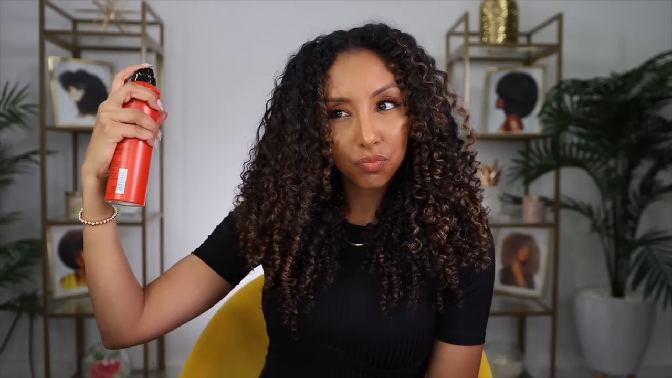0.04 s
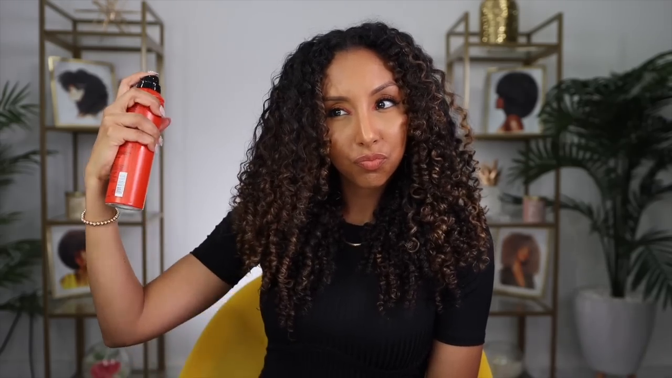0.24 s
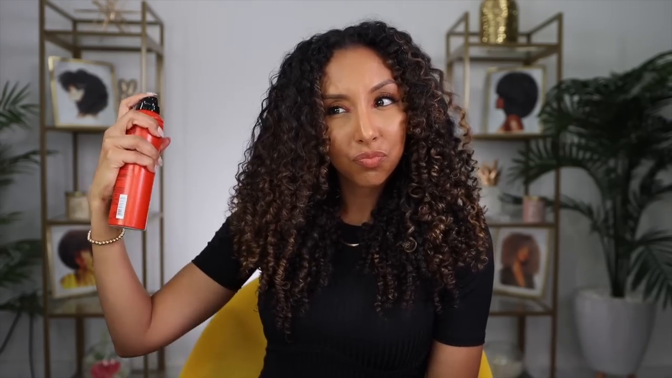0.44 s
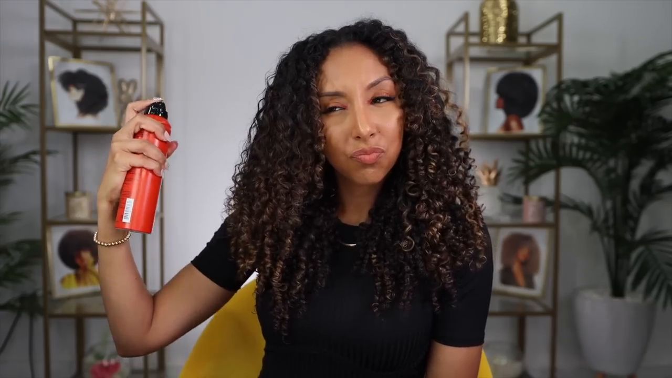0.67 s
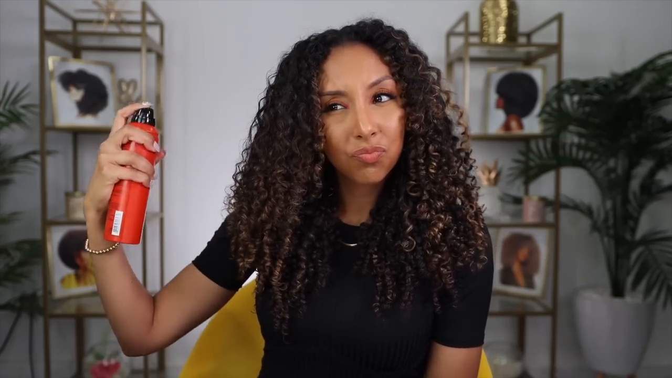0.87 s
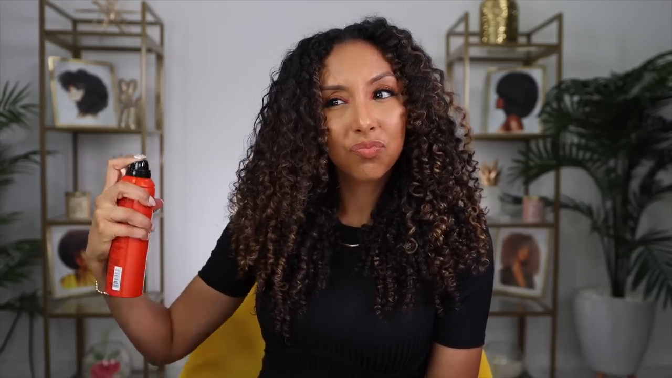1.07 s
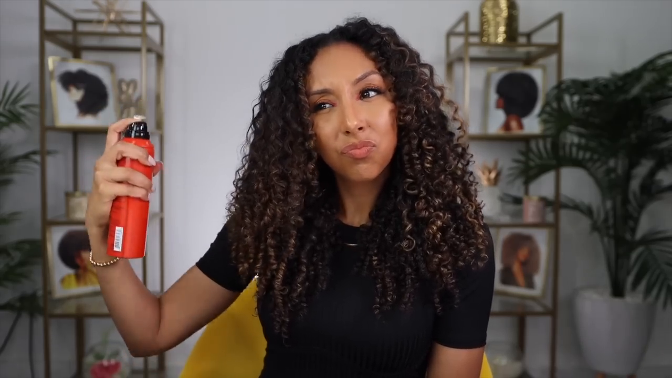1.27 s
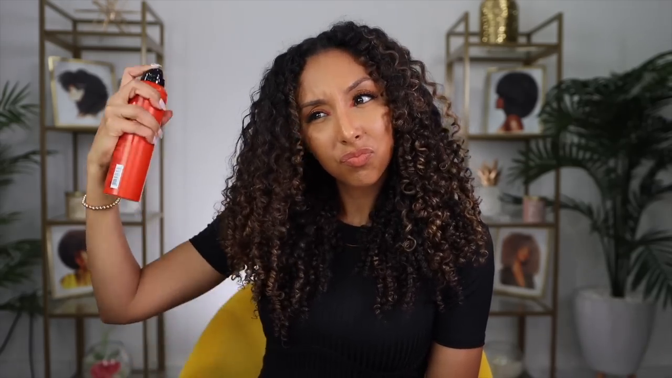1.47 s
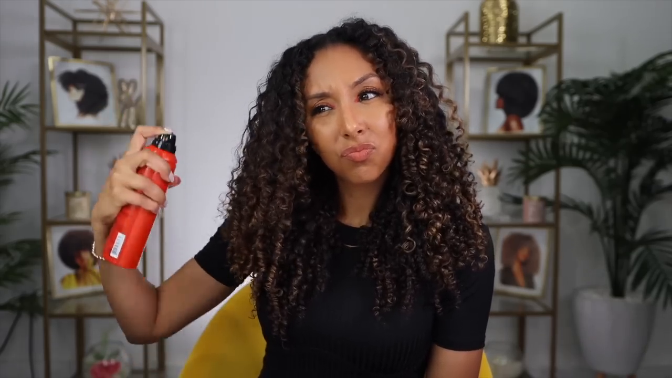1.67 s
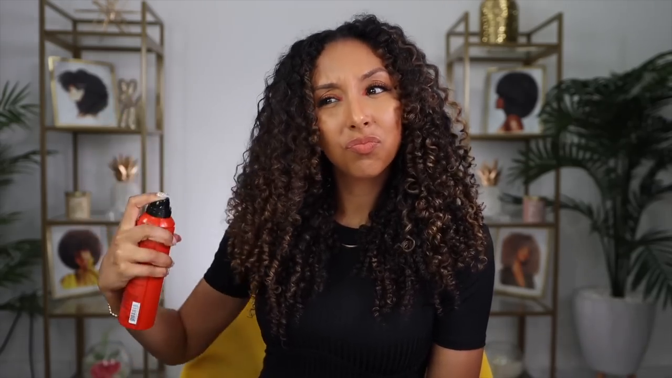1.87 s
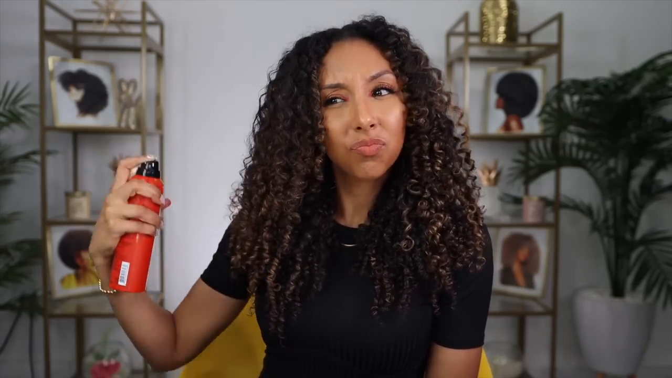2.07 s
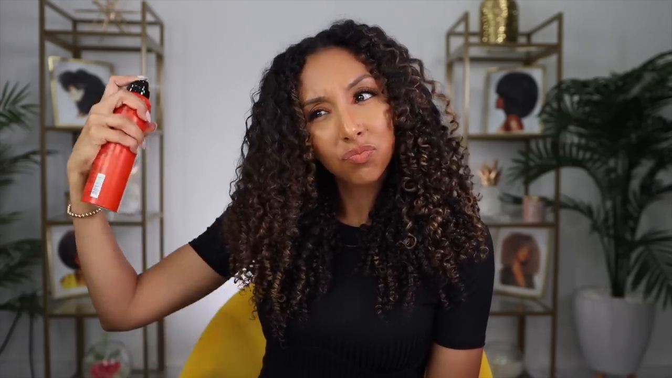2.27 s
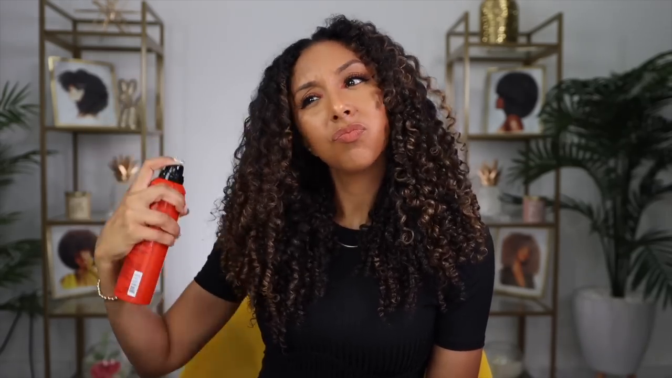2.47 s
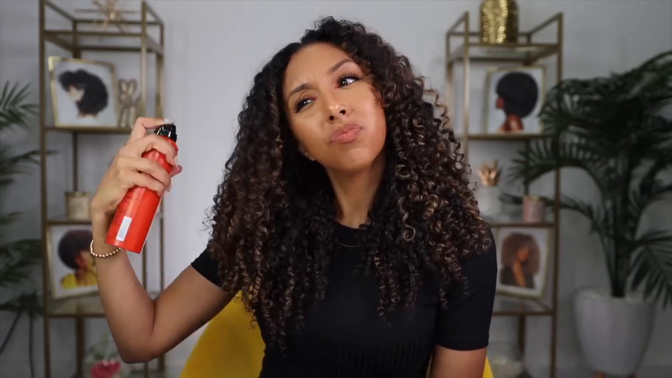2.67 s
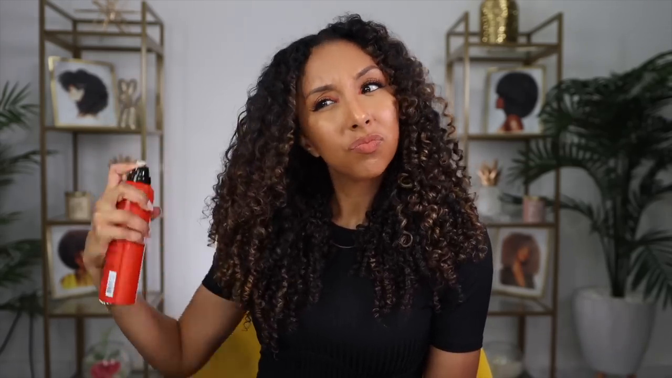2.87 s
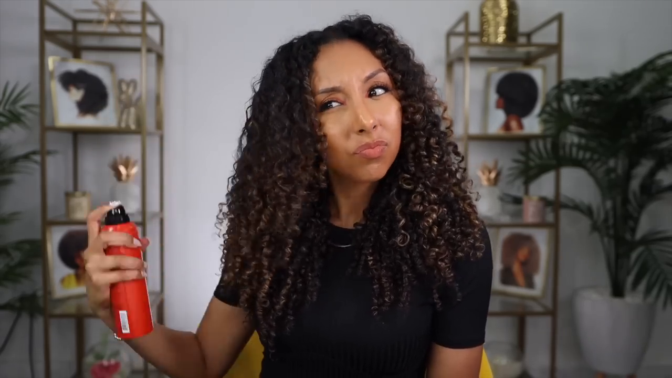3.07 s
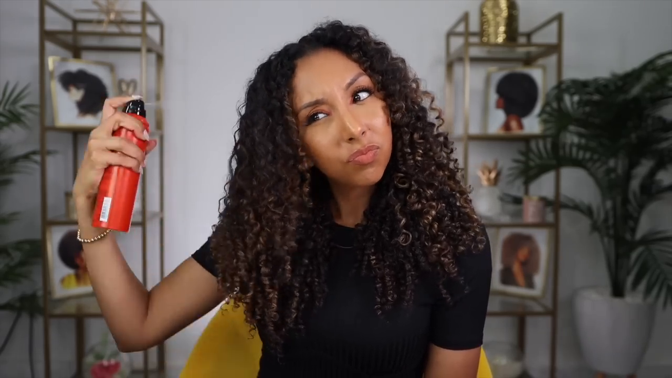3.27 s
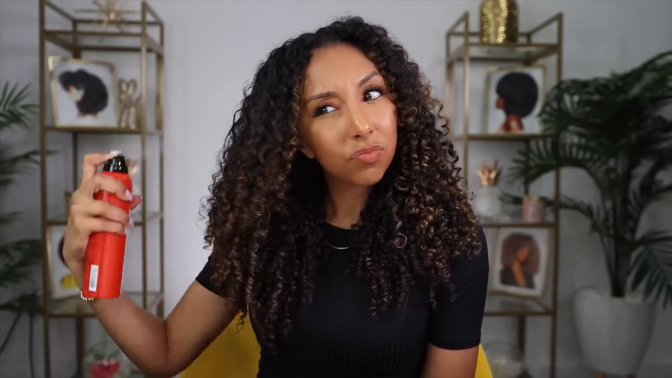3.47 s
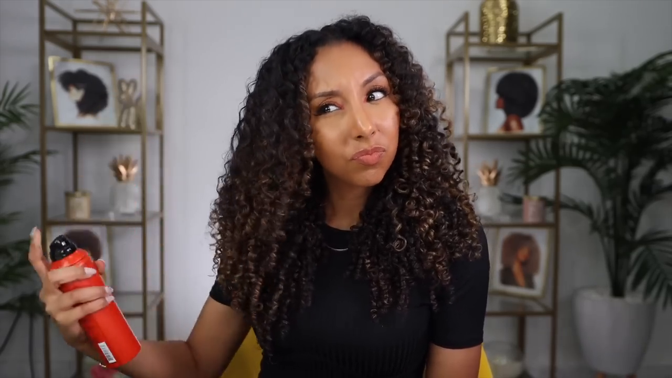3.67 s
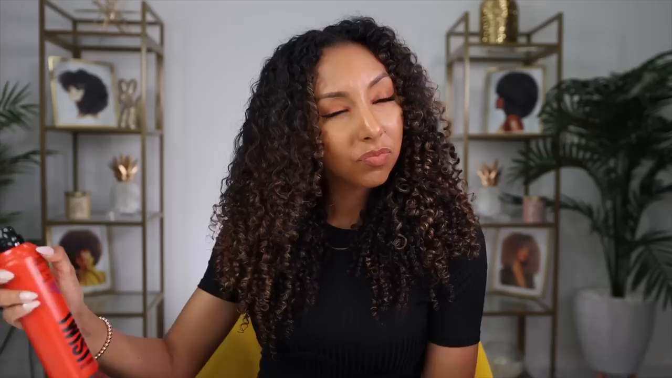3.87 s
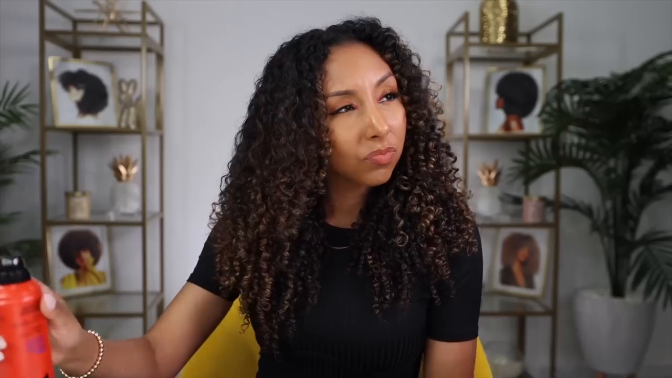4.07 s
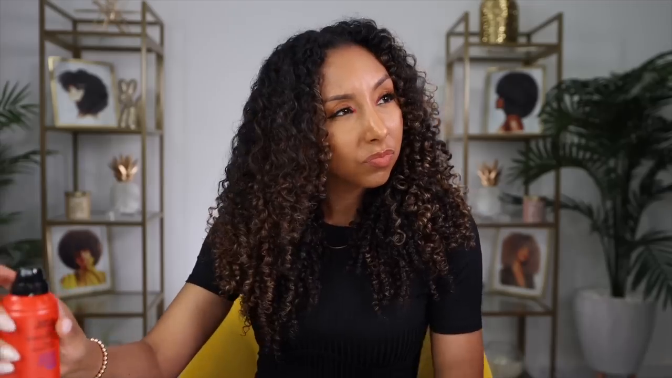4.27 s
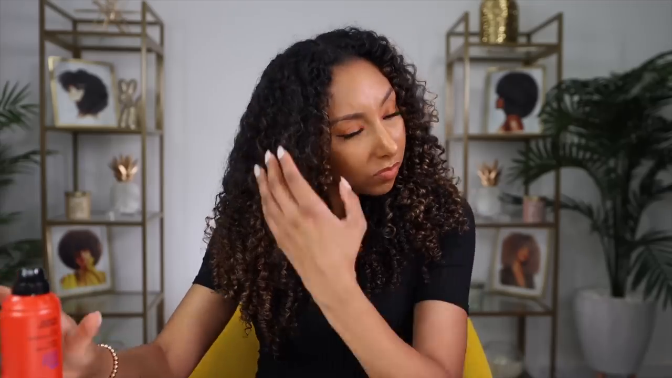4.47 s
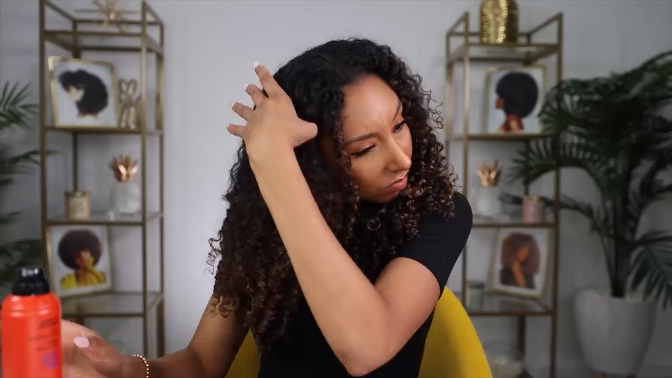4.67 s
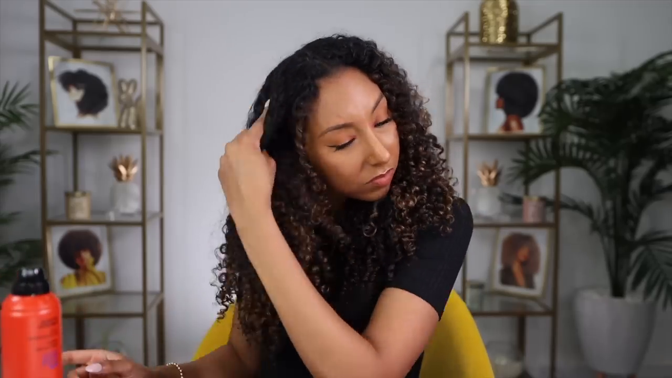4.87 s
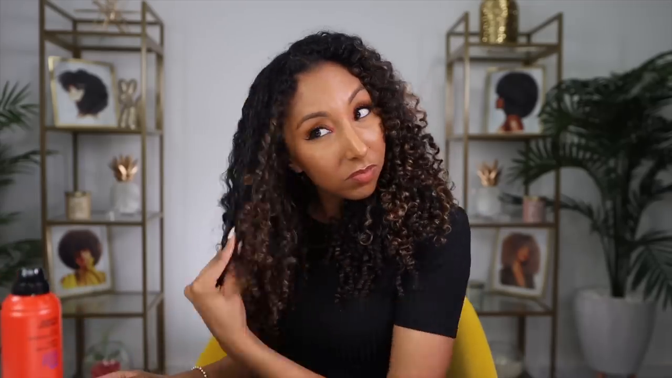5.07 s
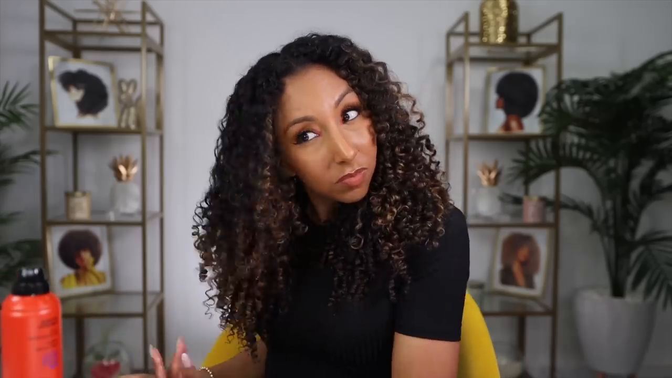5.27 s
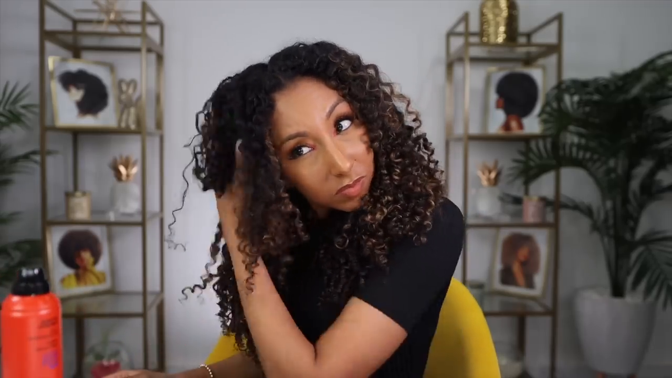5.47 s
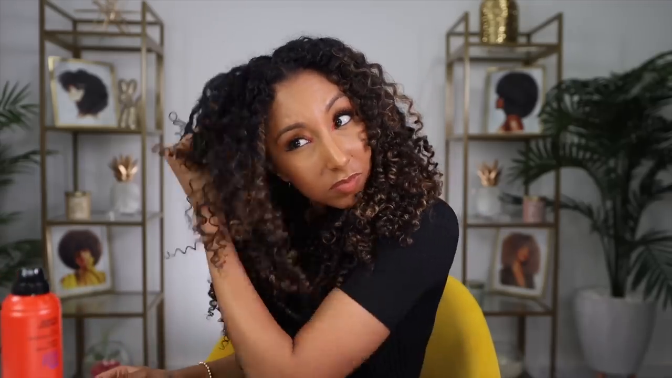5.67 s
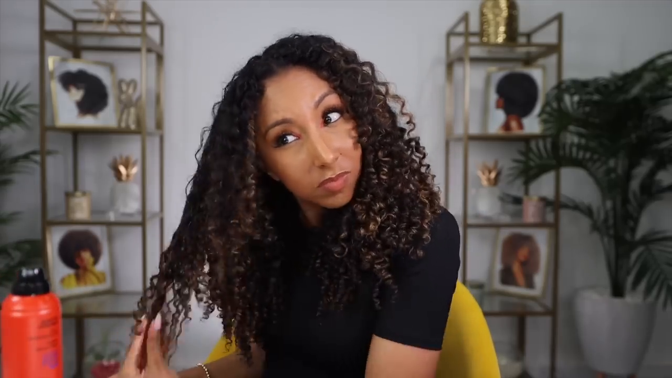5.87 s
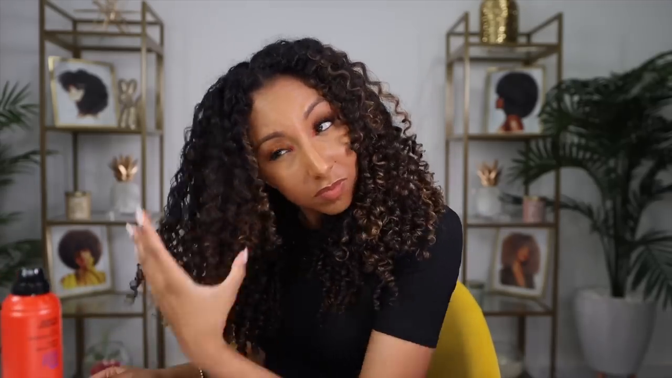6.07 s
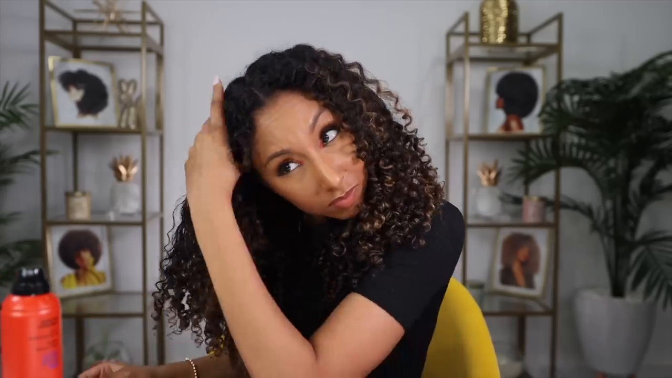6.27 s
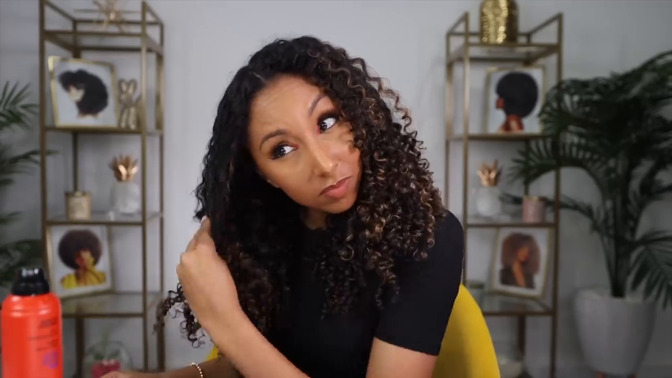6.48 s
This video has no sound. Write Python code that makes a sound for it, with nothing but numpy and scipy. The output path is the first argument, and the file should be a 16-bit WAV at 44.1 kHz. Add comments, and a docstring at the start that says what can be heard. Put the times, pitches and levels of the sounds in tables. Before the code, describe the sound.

Short, clicky spritzes from a hand-held spray can, close up indoors, then a louder knock as it is set on a table.

```python
"""A hand-held spray can is pressed ten times, close to the microphone in a quiet furnished room.
The plastic button clicks, mist hisses and bounces off the body, and gas sputters through the nozzle
as the can tilts. The can is set down on a table and rocks once, ringing the can, the top and the frame.
Then fingers comb through hair and nails tap something hollow. Ventilation hums in the background."""
import sys
import numpy as np
from scipy import signal
from scipy.fft import rfft, irfft
from scipy.io import wavfile
from scipy.ndimage import uniform_filter1d, map_coordinates

SR = 44100
rng = np.random.default_rng(int(sys.argv[2]) if len(sys.argv) > 2 else 0)


def generate_wav(sig):
    """Save sig (samples, or channels by samples) to the path in sys.argv[1] as 16-bit PCM at SR."""
    pcm = np.round(np.clip(np.atleast_2d(sig).T, -1, 1) * 32767).astype(np.int16)
    wavfile.write(sys.argv[1], SR, pcm)


N = 287973
ONSET_DELAY_S = .0012  # clicks, knocks and hiss start 1.2 ms after their listed times
BURST = np.arange(8192)  # sample offsets spanning one burst of spray


def amp(db):
    """Decibels to gain."""
    return 10 ** (np.asarray(db) / 20)


def unit_rms(x):
    """Scales to rms 1."""
    return x / np.sqrt(np.mean(x ** 2) + 1e-20)


def read(points, hz):
    """Reads a curve on a log-frequency axis."""
    f, value = np.transpose(points)
    return np.interp(np.log(hz + 1), np.log(f + 1), value)


def add(mix, s, sound):
    """Mixes a sound in at s seconds."""
    part = mix[round(s * SR):][:len(sound)]
    part += sound[:len(part)]


def coloured(spectrum):
    """Steady noise of rms 1 with the given spectrum."""
    gain = amp(read(spectrum, np.fft.rfftfreq(N, 1 / SR)))
    return unit_rms(irfft(rfft(rng.standard_normal(N)) * gain, N))


def resonate(x, hz, width):
    """A resonance of gain 1."""
    return signal.lfilter(*signal.iirpeak(hz, hz / max(width, 1), SR), x)


def flutter(smooth_s):
    """Random wobble of rms 1."""
    size = max(round(smooth_s * SR), 2)
    return unit_rms(uniform_filter1d(uniform_filter1d(rng.standard_normal(N), size), size))


def gate(length_s, rise_s, fall_s):
    """Gain that opens, holds and dies away."""
    t = np.arange(0, length_s + 6 * fall_s, 1 / SR)
    return np.minimum(t / rise_s, 1) * np.exp(-np.maximum(t - length_s, 0) / fall_s)


def swell(full_s, held_s, db, rise, fall):
    """Gain that climbs, holds and sinks; rise and fall are in dB per second."""
    t = np.arange(N) / SR - full_s
    return amp(db - rise * np.maximum(-t, 0) - fall * np.maximum(t - held_s, 0))


def struck(modes, rise_s):
    """Dying modes after a short contact, peak 1; wider modes die sooner."""
    t = np.arange(0, .25, 1 / SR)
    ring = sum(amp(db) * np.exp(-np.pi * w * t) * np.sin(2 * np.pi * hz * t) for hz, w, db in modes)
    ring *= 1 - np.exp(-t / rise_s)
    return ring / abs(ring).max()


# Noise between left and right. Each row: frequency in Hz, relative level in dB.
SIDE_SPECTRUM = [(25, -40), (100, 17), (1000, -8), (16500, -18.5)]

def side_noise():
    """Very faint steady noise, opposite in the two channels, giving slight stereo width."""
    return amp(-85.5) * coloured(SIDE_SPECTRUM) * [[1], [-1]]


# The air all around the microphone. Each row: frequency in Hz, relative level in dB.
AIR_SPECTRUM = [(15, -43.5), (25, -9), (161, -3.5), (185, -5), (285, -17), (317, -9), (405, -18.5),
                (531, -16.5), (641, -14), (734, -17.5), (1610, -20), (1740, -25), (16000, -34.5)]
# Background hums. Each row: frequency in Hz, width in Hz, level in dB.
HUMS = [(99, 73, -73.5), (157, 45, -74), (239, 12, -74.5), (327, 21, -72), (526.3, 13, -78.5)]
# A low drone far off. One row: time at full level in seconds, hold in seconds, level in dB.
FAR_DRONE = (5.96, 0.14, -63.5)

def room_tone():
    """Ventilation noise, fuzzy hums and one swell of a wavering drone."""
    air = amp(-65) * coloured(AIR_SPECTRUM) * amp(0.64 * flutter(0.21))
    hums = sum(amp(db) * unit_rms(resonate(rng.standard_normal(N), hz, w)) for hz, w, db in HUMS)
    drone_hz = 125.8 + 2.8 * flutter(.05)
    drone = np.sqrt(2) * np.sin(2 * np.pi * np.cumsum(drone_hz) / SR)
    return air + hums + drone * swell(*FAR_DRONE, rise=40, fall=64)


# The furnished room. Each row: frequency in Hz, seconds to fall 60 dB, relative level in dB.
ROOM_DECAY = [(100, 0.73, -6.5), (298, 0.37, 3), (638, 0.33, -1), (1030, 0.36, 2), (2200, 0.44, -3),
              (3970, 0.51, -3.1), (5056, 0.38, -2.5), (6840, 0.43, -3.5), (11000, 0.21, 0),
              (16150, 0.49, -5.5)]
# Surfaces near the microphone. Each row: delay in seconds, gain in dB.
NEAR_ECHOES = [(.004, -16.5), (0.0108, -20), (0.02, -22.5), (.0235, -16.5)]

def room(x):
    """Single echoes and a tail of sparse random reflections, each band dying at its own speed."""
    reflections = np.zeros(SR)
    at = np.arange(80, SR - 20, 20) + rng.integers(0, 20, (SR - 81) // 20)  # one per 20 samples
    reflections[at] = rng.choice([-1., 1.], len(at))
    hz, t, bands = signal.stft(reflections, SR, nperseg=256)
    t60, back_db = (read(np.array(ROOM_DECAY)[:, [0, k]], hz)[:, None] for k in (1, 2))
    tail = signal.istft(bands * amp(back_db - 60 * t / t60), SR, nperseg=256)[1]
    tail = amp(-3) * tail / np.linalg.norm(tail)
    for s, db in NEAR_ECHOES:
        add(tail, s, amp([db]))
    return signal.fftconvolve(x, tail)[:N]


# Strands rubbing, heard close up. Each row: frequency in Hz, relative level in dB.
HAIR_SPECTRUM = [(300, -16), (1000, -8), (2200, -8.5), (3000, -6.5), (3700, -3.5), (4300, -6), (5000, -11),
                 (8000, -12), (13500, -11.5), (16500, -16)]
# Finger strokes. Each row: time at full level in seconds, hold in seconds, level in dB.
HAIR_STROKES = [(5.02, 0.21, -65), (5.57, .03, -71.5), (5.761, 0.044, -64), (5.851, 0.028, -55),
                (6.48, .06, -61)]

def hair():
    """Fingers comb through hair in swells of grainy rustle."""
    strokes = sum(swell(*row, rise=100, fall=180) for row in HAIR_STROKES)
    return strokes * coloured(HAIR_SPECTRUM) * amp(1.3 * flutter(0.0028) + 0.34 * flutter(0.026))


# A small hollow object. Each row: frequency in Hz, width in Hz, relative level in dB.
HOLLOW_MODES = [(635, 59, 0), (1320, 110, 3.5), (2030, 180, 3)]
# Taps near the microphone. Each row: start in seconds, peak in dB, lift of the upper modes in dB.
NAIL_TAPS = [(6.358, -45.5, 1), (6.463, -44.5, -7), (6.477, -48, 13), (6.495, -47, -1)]

def nail_taps():
    """Nails set something small and hollow ringing."""
    out = np.zeros(N)
    for s, db, upper_db in NAIL_TAPS:
        modes = [(hz, w, mode_db + upper_db * (hz > 1000)) for hz, w, mode_db in HOLLOW_MODES]
        add(out, s, amp(db) * struck(modes, rise_s=0.00034))
    return out


# Bright noise of the slides and the rim's buzz. Each row: frequency in Hz, relative level in dB.
FRICTION_SPECTRUM = [(1500, -30), (3000, 1.5), (3900, 4), (5500, -0.5), (9000, 2.5), (13000, -1.5),
                     (16500, -10)]
# Handling near the microphone. Each row: start in seconds, length in seconds, level in dB.
SLIDES = [(0.278, 0.015, -68), (0.294, 0.025, -72), (0.477, 0.023, -65.5), (0.617, .012, -68.5),
          (3.803, 0.023, -68.5), (3.821, 0.084, -66.5), (3.901, 0.11, -62.5), (3.987, 0.056, -63.5),
          (4.345, 0.068, -61.5), (4.405, 0.071, -66.5)]

def slides():
    """Fingers and sleeve slide in brief, soft-edged rubs."""
    level = np.zeros(N)
    for s, length_s, db in SLIDES:
        add(level, s, amp(db) * signal.windows.tukey(round(length_s * SR), .6))
    return level * coloured(FRICTION_SPECTRUM) * amp(flutter(0.0022))


# The rim on the table. One row: start in seconds, level in dB, decay time in seconds.
RIM_BUZZ = (4.2085, -46.5, .004)

def rim_buzz():
    """The can's rim buzzes briefly as it lands."""
    s, db, fall_s = RIM_BUZZ
    level = np.zeros(N)
    add(level, s, amp(db) * gate(0.0042, rise_s=.0005, fall_s=fall_s))
    return level * coloured(FRICTION_SPECTRUM)


# The can, the booming table top and its ringing frame.
# Each row: frequency in Hz, width in Hz, relative level in dB.
CAN_MODES = [(745, 64, -23), (960, 87, -23.5), (1000, 93, -15), (1168, 520, 8.5), (1403, 460, -3.5),
             (1755, 500, -2), (2020, 550, -3.5), (2410, 230, -16), (3538, 500, -4.5), (4020, 560, -13.5),
             (5750, 2500, -24)]
TOP_MODES = [(150, 50, -29), (253, 61, -13.5), (328, 78, -13.5), (494, 130, -5.5)]
FRAME_MODES = [(211.6, 21, -11), (388.4, 26, -14.5)]
# The can lands and rocks near the microphone. Each row: start in seconds, level in dB,
# softness in dB lost per octave, boom of the top in dB, ring of the frame in dB.
BLOWS = [(4.2078, -1, 0.7, -1, -24), (4.393, -22, 2.5, -16, -5.5), (4.401, -23, 11, 1.5, 10.5),
         (4.461, -33, 9, 4.5, -5)]

def knocks():
    """The can meets the table top; a softer blow reaches the can's high modes less."""
    out = np.zeros(N)
    for s, db, soft_db, boom_db, ring_db in BLOWS:
        modes = [(hz, w, mode_db - soft_db * np.log2(hz / 1000)) for hz, w, mode_db in CAN_MODES]
        modes += [(hz, w, mode_db + boom_db) for hz, w, mode_db in TOP_MODES]
        modes += [(hz, w, mode_db + ring_db) for hz, w, mode_db in FRAME_MODES]
        add(out, s, -amp(db) * struck(modes, rise_s=0.00054))
    # small bodies radiate no deep bass
    return signal.sosfilt(signal.butter(2, 150, "high", fs=SR, output="sos"), out)


# Stray ticks, close by. Each row: start in seconds, peak in dB, frequency in Hz.
TICKS = [(1.129, -36, 4470), (1.841, -32, 6300), (2.775, -39, 3930), (4.673, -44, 14800),
         (5.027, -51.5, 9000)]

def ticks():
    """Tiny bright ticks, each one heavily damped mode."""
    out = np.zeros(N)
    for s, db, hz in TICKS:
        add(out, s, amp(db) * struck([(hz, 0.18 * hz, 0)], rise_s=0.00025))
    return out


# The nozzle's resonances. Each row: frequency in Hz, width in Hz, relative level in dB.
NOZZLE_MODES = [(1830, 650, -11), (3160, 670, 0), (3520, 290, -6), (3852, 800, 1), (6040, 540, -5),
                (7700, 1200, -8), (11800, 3900, -14.5)]
# Gas at the nozzle. Each row: start in seconds, length in seconds, level in dB, pitch factor.
SPUTTERS = [(1.091, 0.069, -53, 1.11), (1.59, 0.0042, -40, 1), (1.838, 0.02, -42, 1.02),
            (2.772, 0.026, -42.5, .98), (2.947, 0.11, -42.5, 1.034), (3.297, 0.055, -43.5, 1.01),
            (3.486, .12, -42, 1.036)]

def sputter():
    """Gas bubbles ring the nozzle in rough bursts."""
    out = np.zeros(N)
    bubbles = rng.standard_normal(N) * amp(2.3 * flutter(0.0016))
    for s, length_s, db, pitch in SPUTTERS:
        drive = bubbles[round(s * SR) + BURST]
        ring = sum(amp(mode_db) * resonate(resonate(drive, hz * pitch, w), hz * pitch, w)
                   for hz, w, mode_db in NOZZLE_MODES)
        gas = gate(length_s, rise_s=0.0049, fall_s=0.0054)[:len(BURST)]
        add(out, s, amp(db) * gas * unit_rms(ring)[:len(gas)])
    return out


# The plastic button. Each row: frequency in Hz, width in Hz, relative level in dB.
BUTTON_MODES = [(757, 166, -3.5), (1516, 100, -24.5), (2120, 470, 8), (2904, 770, 3), (3400, 1200, -5),
                (6600, 1800, -5)]
# Touches with the valve shut. Each row: start in seconds, peak in dB, grip as a damping factor,
# gain of the hollow low modes in dB.
NUDGES = [(0.0387, -38, 1.4, -8), (3.672, -43.5, 1.1, -1)]
# Presses near the microphone. Each row: start in seconds, valve open in seconds,
# click peak in dB, grip as a damping factor, gain of the hollow low modes in dB, mist dullness in
# dB lost per octave (negative brightens), body echo delay in ms, its drift in ms per second.
PRESSES = [(0.708, 0.094, -26.5, 0.94, -4.5, -0.6, 0.87, -0.22),
           (1.0902, 0.1, -27.5, 2, -4, -1.5, 0.72, -0.61),
           (1.483, 0.11, -27, 0.88, -3.5, -1.5, 0.95, -0.028),
           (1.74, 0.12, -24, 1.66, -7, -1.7, 0.73, -1.06),
           (2.011, 0.11, -25.5, 1.2, -12.5, -2, 0.543, 0.71),
           (2.34, 0.14, -25.5, 0.86, -6.5, -1.6, 0.957, -0.85),
           (2.6698, 0.12, -24.5, 1.78, -9.5, -1.5, 0.696, 1.2),
           (2.9265, 0.13, -26.5, 1.52, -9, -1.3, 0.68, -1.9),
           (3.2154, 0.134, -26.5, 0.97, -10, -1, .674, 1.3), (3.4668, 0.135, -28, 1.4, -6, 0, 0.83, -2.16)]

def button():
    """The button snaps down; a firmer finger damps it and raises its note."""
    out = np.zeros(N)
    clicks = [(s, db, grip, hollow_db) for s, _, db, grip, hollow_db, *_ in PRESSES]
    for s, db, grip, hollow_db in NUDGES + clicks:
        pitch = 0.91 + 0.092 * grip
        modes = [(hz * pitch, w * grip, mode_db + hollow_db * (hz < 1500))
                 for hz, w, mode_db in BUTTON_MODES]
        add(out, s, amp(db) * struck(modes, rise_s=0.0011))
    return out


# The jet of mist, heard close up. Each row: frequency in Hz, relative level in dB.
MIST_SPECTRUM = [(300, -35), (900, -7.5), (2000, -11), (3800, 1), (5300, -5.5), (6000, -3.5), (7700, -5.5),
                 (12000, -7.5), (16500, -11.5)]

def mist():
    """Mist hisses while the valve is open, each press with its own brightness."""
    out = np.zeros(N)
    hiss = coloured(MIST_SPECTRUM) * amp(1.1 * flutter(0.0024))
    octaves = np.log2(1 + np.fft.rfftfreq(len(BURST), 1 / SR) / 1000)
    for s, open_s, *_, dull_db, _, _ in PRESSES:
        spectrum = rfft(hiss[round(s * SR) + BURST]) * amp(-dull_db * octaves)
        jet = unit_rms(irfft(spectrum))
        valve = gate(open_s, rise_s=0.00055, fall_s=0.0045)[:len(BURST)]
        add(out, s + ONSET_DELAY_S, amp(-46) * valve * jet[:len(valve)])
    return out


def spray():
    """Mist and sputter bounce off head and shoulder; the echo's delay drifts as the can sweeps."""
    out = mist() + sputter()
    for s, *_, echo_ms, drift in PRESSES:
        direct = out[round(s * SR) + BURST]
        delay = (echo_ms * SR + drift * BURST) / 1000  # samples
        add(out, s, amp(-11.5) * map_coordinates(direct, [BURST - delay], order=3))
    return out


def scene():
    """Can and hands close to one microphone, with the room behind them."""
    hits = np.roll(button() + knocks(), round(ONSET_DELAY_S * SR))
    jet = spray() + ticks()
    hands = hair() + nail_taps() + slides()
    reverb = room(amp(-2) * hits + amp(-5.5) * jet + amp(-9) * hands)
    return hits + jet + hands + reverb + rim_buzz() + room_tone() + side_noise()


def record(dry):
    """The treble ends steeply at 16050 Hz."""
    lowpass = signal.firwin(511, 16050, window=("kaiser", 9), fs=SR)
    return signal.oaconvolve(dry, lowpass[None], "same")


dry = scene()
out = record(dry)
generate_wav(out)
```